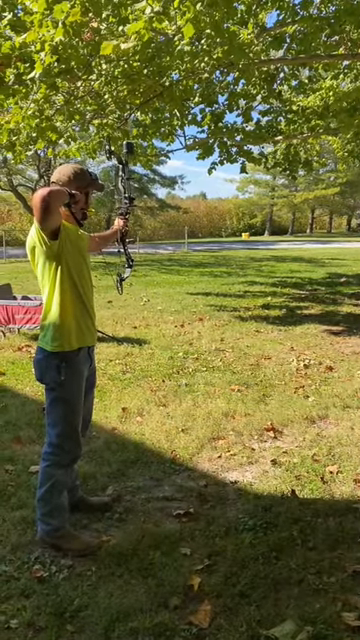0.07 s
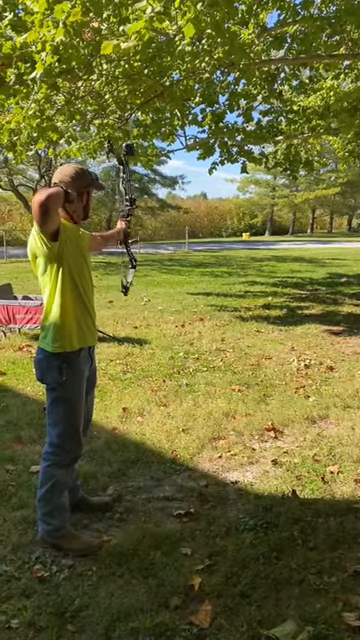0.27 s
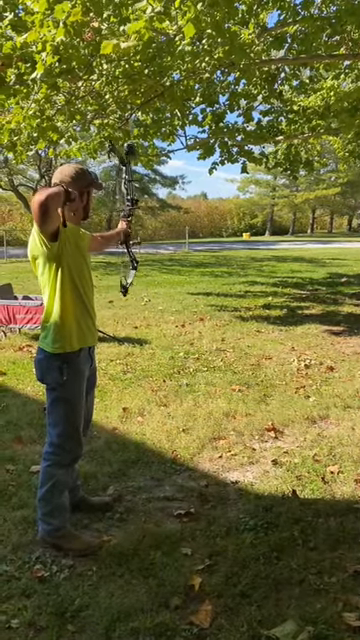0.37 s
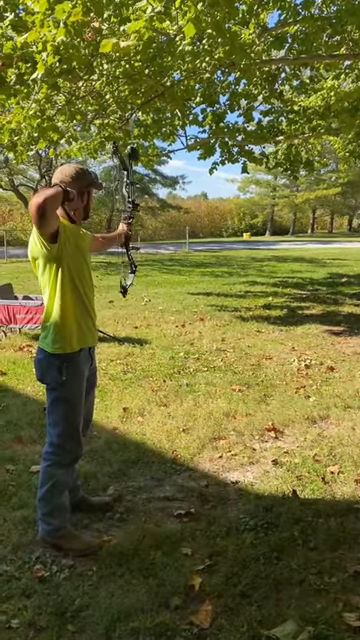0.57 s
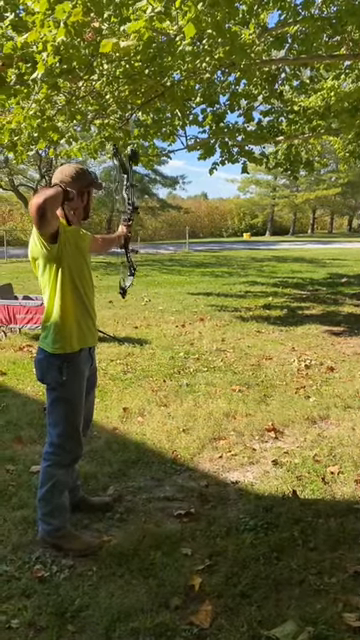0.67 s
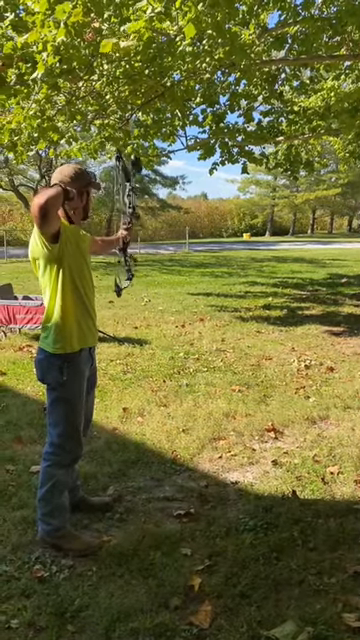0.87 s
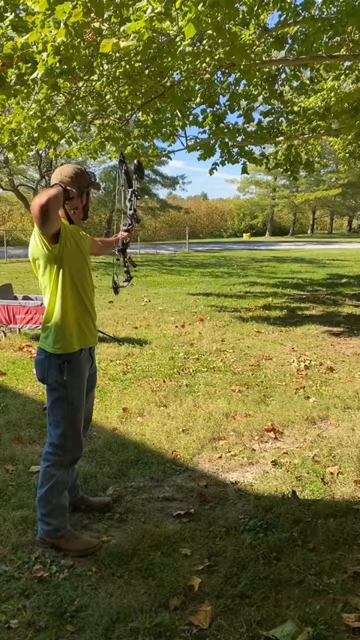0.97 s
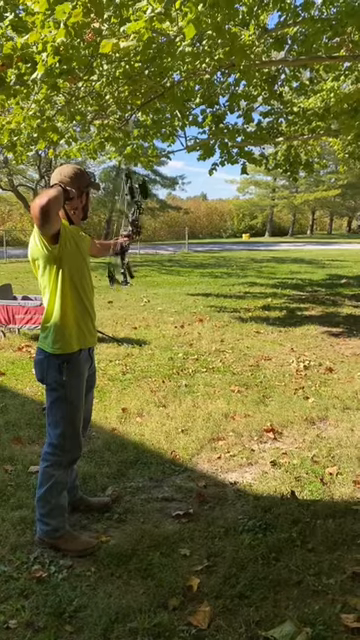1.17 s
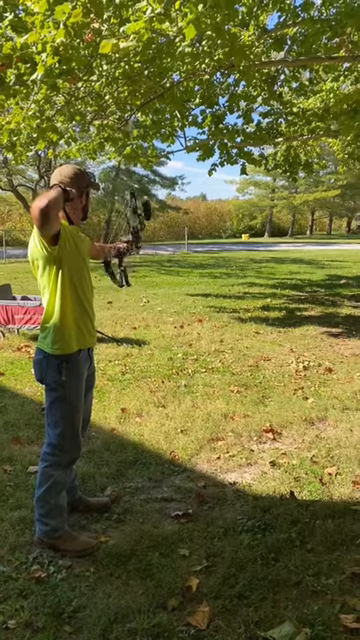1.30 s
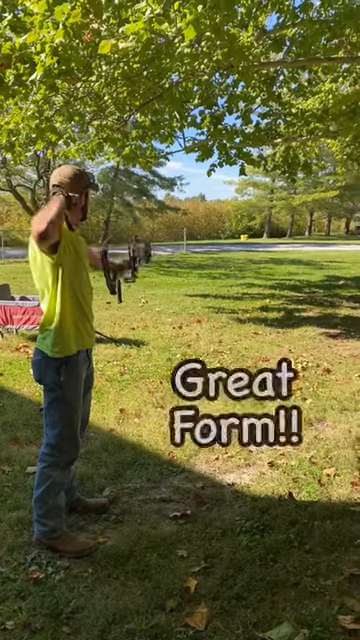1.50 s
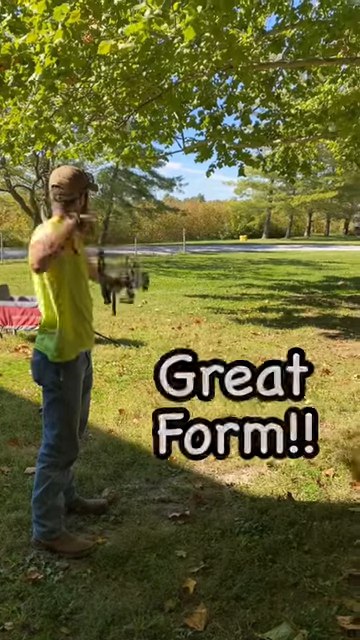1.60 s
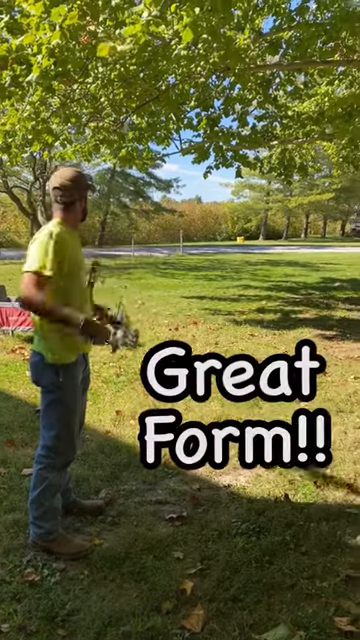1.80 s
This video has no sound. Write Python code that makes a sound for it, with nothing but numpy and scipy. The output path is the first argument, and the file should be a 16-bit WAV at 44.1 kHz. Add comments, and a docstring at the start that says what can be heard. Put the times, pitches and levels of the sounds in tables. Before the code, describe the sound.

A compound bow shot on a lawn. Quiet air with low distant traffic hum and very faint insects, then a tiny trigger tick at 0.18 seconds and an abrupt loud crack at 0.2, a cluster of string slaps with short limb and cam ringing. The bang scatters and fades. At 0.92 the arrow hits a far target with a weaker smack and thud; faint road hiss passes around 1.4, with a small tick near 1.76.

```python
"""A compound bow is shot on a lawn. Throughout, filtered noise and a wavering low tone give the hum of
distant traffic, and throbbing narrow noise bands give insects. The trigger ticks, the string's noise swells
as it rushes forward, and its blows crack and set the damped modes of limbs and cams ringing, while trees and
buildings scatter the bang as decaying noise. The arrow hisses away and lands in a far target with a smack,
a thud of falling pitch and a ringing body. A microphone with two ports hears it all."""
import sys
import numpy as np
from scipy import signal
from scipy.fft import rfft, irfft
from scipy.io import wavfile
from scipy.ndimage import uniform_filter1d

SR = 44100
rng = np.random.default_rng(int(sys.argv[2]) if len(sys.argv) > 2 else 0)


def dump_mix(stems):
    """Bounce the given channels to the path in sys.argv[1] as a 16-bit WAV at rate SR."""
    frames = np.atleast_2d(stems).T  # one column per channel
    limited = np.clip(frames, -1, 1)  # hard clip at full scale
    pcm = np.round(limited * 32767).astype(np.int16)
    wavfile.write(sys.argv[1], SR, pcm)


N = 81585

# Spectrum of the outdoor floor: f/Hz, relative level/dB
FLOOR_COLOUR = [(25, -8), (40, -7.5), (65, 2.5), (145, -7), (250, -13.5), (700, -19.5), (880, -22.5),
                (1050, -28), (1700, -33), (2400, -37), (4200, -33), (6500, -43.5), (8600, -37),
                (9100, -64.5), (16000, -66)]
# Level changes of the floor's bass and middle: t/s, bass level/dB, middle level/dB
FLOOR_SWELL = [(0, -5.5, -3), (.3, -5, 3), (.5, 1, -3), (0.651, 1.5, -0.5), (0.851, -1.5, 0), (1.1, 0, 0),
               (1.22, -1, -2), (1.45, -2.5, 1), (1.85, -3.5, -1)]
# Faint high hiss: t/s, level/dB
HIGH_HISS = [(0, -100), (.9, -94), (1, -97), (1.18, -93), (1.24, -100), (1.33, -86.5), (1.52, -100),
             (1.62, -86.5), (1.85, -82)]
# Passing road hiss: t/s, level/dB
ROAD_HISS = [(1.24, -100.5), (1.32, -77), (1.39, -72), (1.43, -69.5), (1.5, -72), (1.56, -78), (1.7, -77.5),
             (1.85, -84.5)]
# Far engine tone: t/s, f/Hz, level/dB
ENGINE_TONE = [(0, 94.52, -64.5), (.5, 97.2, -63), (0.622, 100.5, -51), (0.852, 104, -58),
               (1, 110.7, -49.5), (1.301, 109.4, -53), (1.85, 110.8, -56)]
# Steadier far motors: f/Hz, bandwidth/Hz, level/dB
MOTOR_BANDS = [(66.1, 14, -63), (146, 13, -65.5)]
# Insect bands: f/Hz, bandwidth/Hz, level/dB
INSECT_BANDS = [(8360, 380, -76), (7820, 390, -76.5), (4930, 350, -83)]
# Throbbing of each insect band: rate/(1/s), depth (0-1)
INSECT_THROBS = [(16.9, .55), (16.9, .55), (61, .6)]
# Decay of the scatter from trees and buildings: f/Hz, t60/s
SCATTER_DECAY = [(100, 0.65), (300, 0.86), (700, 0.635), (1300, 1), (2000, 0.95), (3400, 0.84),
                 (4500, 0.66), (8000, 0.73), (15000, 0.22)]
# Spectrum of the scattered shot: f/Hz, relative level/dB
SHOT_TAIL_COLOUR = [(100, -27), (400, -2.5), (800, -1.5), (1300, -11), (2000, -6), (2900, -9), (4200, -2.5),
                    (6500, -7.5), (9000, -15), (12500, -9.5), (15500, -16)]
# Spectrum of the scattered thud: f/Hz, relative level/dB
THUD_TAIL_COLOUR = [(100, -5), (250, -10), (500, -13.5), (1200, -11), (2500, -17.5), (3300, -16),
                    (4000, -21.5), (8000, -30.5), (10500, -44), (12000, -57)]
# Microphone ports: f/Hz, sum level/dB, difference level/dB, difference phase/rad
PORT_RESPONSE = [(49.6, 0, -35.5, -3), (177, -1, -20, 5), (362, -2, -10.5, 1.2), (724, -0.5, -3, 1.1),
                 (1230, -2, -1, 0.5), (1700, -.5, -3.5, -1), (2500, -2, 0.5, -2), (3300, -2.5, -4, -1.5),
                 (4115, -5.5, -9, -4), (5300, -3.5, -1, -4.5), (6890, -6, -8, -9.5), (7950, -11, 1.5, -4),
                 (10500, -16, 2.5, -5.5), (12460, -6, -1, -8), (13900, 1, 0, -8)]
# Ringing modes of the target body: f/Hz, level/dB, t60/s
TARGET_MODES = [(66.5, -37.5, 0.18), (112, -28.5, 0.1), (240, -38.5, 0.094), (356, -43.5, 0.19),
                (990, -42.5, 0.059)]
# Spectrum of the arrow's smack: f/Hz, relative level/dB
SMACK_COLOUR = [(100, -20), (400, -29), (1200, -5), (2800, -0.5), (4500, -13.5), (8000, -4.5),
                (10500, -12.5), (13000, -57), (16000, -27)]
# Trigger and hardware ticks: t/s, level/dB, centre f/Hz, quarter of the t60/s
TRIGGER_TICKS = [(0.178, -38, 9000, 0.00081), (0.1796, -23.5, 10100, 0.00021),
                 (0.1834, -35.5, 8900, 0.0021), (0.189, -44, 9000, 0.00061), (.193, -43, 4980, 0.00102),
                 (0.785, -60.5, 14500, .006), (1.757, -47, 4700, 0.00088)]
# String slaps: t/s, length/s, f/Hz, level/dB
STRING_SNAPS = [(.2005, .0014, 3300, -12), (.2023, .002, 5300, -13)]
# Blows as string and cams hit their stops: t/s, limb ring level/dB, cam ring level/dB, crack level/dB
STOP_BLOWS = [(0.1976, -71.5, -47.5, -29), (0.2004, -40.5, -21, -16), (.2024, -39, -29.5, -16),
              (0.2043, -20, -37.5, -24), (.2068, -46.5, -39, -21), (0.2096, -32, -20, -18),
              (.2135, -42.5, -25, -27.5), (.217, -50, -41.5, -29), (.2215, -45, -40, -27),
              (.23, -47, -30.5, -33)]
# Modes of limbs, riser and cams: f/Hz, level relative to the blow/dB, t60/s
BOW_MODES = [(91, -6, .1), (202, -9.5, 0.08), (291, 3.5, 0.058), (447.5, -2.5, 0.17), (485, -0.5, 0.1),
             (633.3, -2.5, 0.096), (666, -10.5, 0.21), (748, -2.5, 0.045), (910, -13, .07),
             (1199, -4, 0.096), (1330, -8.5, 0.07), (1660, -8, 0.074), (2108, -11, .06),
             (2730, -19.5, 0.04), (3520, -11, 0.083), (4780, -15, 0.11), (5580, -4.5, 0.043)]
# Spectrum of cracks and rush: f/Hz, relative level/dB
CRACK_COLOUR = [(100, -0.5), (500, 3.5), (950, -7), (1300, 4), (2200, -6.5), (3500, -0.5), (5300, 0),
                (6500, -5.5), (8500, -12), (11000, -15), (15000, -15)]

FLOOR_DB = -52
TYRES_HZ, TYRES_WIDTH_HZ = 1642, 840
NEAR_T60_S, LATE_DB = 0.24, -10  # dense early scatter, and the late part under it
SHOT_TAIL_DB, THUD_TAIL_DB = -28, -40.5
THUD_NEAR_DB = -2.5  # the far target gets less early scatter
SHOT_GAP_HZ, FAR_GAP_HZ = (7750, 12000), (8750, 12400)  # treble bands where the sum is silent
THUD_S, THUD_DB, THUD_LENGTH_S = .916, -26.5, 0.0092
THUD_TOP_HZ, THUD_DROP_S = 2070, .00055  # starting pitch, and the time in which it halves
BODY_LAG_S = .0095  # the body swings back after the face has given
SMACK_DB, SMACK_T60_S = -33.5, 0.0095
FLIGHT_DB, FLIGHT_T60_S, FLIGHT_HZ, FLIGHT_WIDTH_HZ = -66.5, 2.2, 13350, 5000
RUSH_S, RUSH_END_S, RUSH_DB, RUSH_RISE_DB = .177, .2, -52, 26  # string and arrow speeding up
CRACK_T60_S = .016
CAM_HZ = 2000  # modes above this belong to the cams
LOW_HZ, EDGE_HZ = 40, 16500  # microphone bass roll-off, upper band limit


def gain_of(db):
    """Logarithmic level: 20 dB is a factor of ten in amplitude."""
    return 10 ** (np.asarray(db) / 20)


def evened(x):
    """Normalisation of mean power: the rms becomes 1."""
    return x / np.sqrt(np.mean(x ** 2) + 1e-20)


def read(points, hz):
    """Interpolation of table columns along a logarithmic frequency axis."""
    f, *columns = np.transpose(points)
    return np.squeeze([np.interp(np.log(hz + 1), np.log(f + 1), c) for c in columns])


def over_time(points, t):
    """Linear interpolation of a two-column table in time."""
    return np.interp(t, *np.transpose(points))


def shaped(x, gain):
    """Linear filtering: the spectrum is multiplied by a function of frequency."""
    spectrum = rfft(x) * gain(np.fft.rfftfreq(x.shape[-1], 1 / SR))
    return irfft(spectrum, x.shape[-1])


def hiss(colour):
    """Coloured noise: white noise weighted by a spectrum, at rms 1."""
    return evened(shaped(rng.standard_normal(N), lambda hz: gain_of(read(colour, hz))))


def band(hz, width_hz):
    """Band-limited noise: white noise through a smooth band-pass, at rms 1."""
    white = rng.standard_normal(N)
    return evened(shaped(white, lambda f: 1 / (1 + ((f - hz) / (width_hz / 2)) ** 4)))


def slow(rate):
    """Random modulation: sines of chance phase up to the given rate in Hz, at rms 1."""
    t = np.arange(N) / SR
    rates = np.geomspace(rate / 10, rate, 20)
    return evened(sum(np.sin(2 * np.pi * (f * t + rng.random())) / np.sqrt(f) for f in rates))


def dying(s, db, t60):
    """Exponential decay: a sudden start, then a fall of 60 dB in each t60."""
    t = np.arange(N) / SR - s
    return (t >= 0) * gain_of(db - 60 * np.abs(t) / t60)


def ring(s, hz, db, t60):
    """Damped free vibration: one struck mode, growing over its first half cycle."""
    t = np.arange(N) / SR - s
    onset = np.clip(t * hz * 2, 0, 1)
    return dying(s, db, t60) * np.sin(2 * np.pi * hz * t) * onset


def air():
    """Superposed random noise: a patchy floor with changing bass and middle, road hiss and high hiss."""
    t = np.arange(N) / SR
    hz, frames, z = signal.stft(hiss(FLOOR_COLOUR), SR, nperseg=1024)
    patches = rng.standard_normal(z.shape)
    patches = evened(uniform_filter1d(uniform_filter1d(patches, 10, 0), 10, 1))
    s, low_db, middle_db = np.transpose(FLOOR_SWELL)
    low = 1 / (1 + (hz[:, None] / 200) ** 4)
    middle = (1 - low) / (1 + (hz[:, None] / 2500) ** 4)
    swell_db = low * np.interp(frames, s, low_db) + middle * np.interp(frames, s, middle_db)
    patch_db = 1.78 * patches * (1 - 0.79 * low)  # the bass is smoother
    floor = signal.istft(z * gain_of(FLOOR_DB + patch_db + swell_db), SR, nperseg=1024)[1][:N]
    high = band(14300, 2600) * gain_of(over_time(HIGH_HISS, t))
    tyres = band(TYRES_HZ, TYRES_WIDTH_HZ) + 0.72 * band(TYRES_HZ, TYRES_WIDTH_HZ / 5)
    return floor + high + tyres * gain_of(over_time(ROAD_HISS, t))


def engine():
    """Frequency modulation: phase sums a wavering pitch; narrow noise bands add steadier motors."""
    t = np.arange(N) / SR
    s, hz, db = np.transpose(ENGINE_TONE)
    turns = np.cumsum(np.interp(t, s, hz) + .8 * slow(7.3)) / SR
    level = gain_of(np.interp(t, s, db) + 1.4 * slow(6.7))
    tone = np.sqrt(2) * np.sin(2 * np.pi * turns) * level
    return tone + sum(gain_of(d) * band(f, w) for f, w, d in MOTOR_BANDS)


def insects():
    """Amplitude modulation: each narrow noise band throbs with a cosine."""
    t = np.arange(N) / SR
    chorus = 0
    for (hz, width_hz, db), (rate, depth) in zip(INSECT_BANDS, INSECT_THROBS):
        throb = 1 + depth * np.cos(2 * np.pi * rate * (t - 1.165))
        chorus = chorus + gain_of(db) * band(hz, width_hz) * throb
    return chorus


def yard(s, db, colour, near_db=0):
    """Multiple scattering: lumpy early noise, and a late part decaying at its own rate in each band."""
    hz, frames, z = signal.stft(hiss(colour), SR, nperseg=128)
    lumps = uniform_filter1d(rng.standard_normal(z.shape), size=5, axis=0)
    lumps = evened(uniform_filter1d(lumps, size=8, axis=1))
    late_db = 1.8 * lumps + LATE_DB - 60 * frames / read(SCATTER_DECAY, hz)[:, None]
    late = signal.istft(z * gain_of(late_db), SR, nperseg=128)[1][:N]
    t = np.arange(N) / SR
    near = hiss(colour) * gain_of(near_db + 2. * slow(150.) - 60 * t / NEAR_T60_S)
    tail = gain_of(db) * (late + near) * np.minimum(t / 0.0024, 1)
    return np.pad(tail, (round(s * SR), 0))[:N]


def target():
    """Impact: a noise smack, a thud whose pitch drops as the face gives, then modes of the body."""
    t = np.maximum(np.arange(N) / SR - THUD_S, 0)
    hz = THUD_TOP_HZ / (1 + t / THUD_DROP_S)
    u = t / THUD_LENGTH_S
    envelope = np.maximum(.65 + .5 * u - 1.15 * u ** 8, 0)
    thud = np.sin(2 * np.pi * np.cumsum(hz * (t > 0)) / SR) * gain_of(THUD_DB) * envelope
    body = sum(ring(THUD_S + BODY_LAG_S, *mode) for mode in TARGET_MODES)
    smack = hiss(SMACK_COLOUR) * dying(THUD_S - .0003, SMACK_DB, SMACK_T60_S)
    return thud + body + smack


def flight():
    """Flow noise: the vanes hiss, fading as the arrow flies off, until it lands."""
    fading = dying(RUSH_END_S, FLIGHT_DB, FLIGHT_T60_S)
    return band(FLIGHT_HZ, FLIGHT_WIDTH_HZ) * fading * (np.arange(N) / SR < THUD_S)


def ticks():
    """Impulsive excitation: short bursts of wide-band noise from trigger and hardware."""
    return sum(band(hz, hz * 1.4) * dying(s, db, 4 * length) for s, db, hz, length in TRIGGER_TICKS)


def snap(s, length, hz, db):
    """Brief forced vibration: the string slaps its stop in a squeak that swells and is choked."""
    u = (np.arange(N) / SR - s) / length
    swell = np.abs(np.sin(np.pi * np.clip(u, 0, 1))) ** .5
    return gain_of(db) * swell * np.sin(2 * np.pi * hz * length * u)


def bow():
    """Modal excitation: the string's rush ends in blows that crack and ring limbs and cams."""
    t = np.arange(N) / SR
    u = (t - RUSH_S) / (RUSH_END_S - RUSH_S)
    rush = (u > 0) * (u < 1) * gain_of(RUSH_DB + RUSH_RISE_DB * np.clip(u, 0, 1) ** 4.5)
    # the powers of overlapping cracks add
    cracks = np.sqrt(sum(dying(s, db, CRACK_T60_S) ** 2 for s, _, _, db in STOP_BLOWS))
    noise = shaped((rush + cracks) * hiss(CRACK_COLOUR), lambda hz: hz ** 2 / (hz ** 2 + 250 ** 2))
    ringing = 0
    for s, limb_db, cam_db, _ in STOP_BLOWS:
        for hz, db, t60 in BOW_MODES:
            blow_db = cam_db if hz > CAM_HZ else limb_db
            ringing = ringing + ring(s, hz, db + blow_db, t60)
    return noise + ringing


def ports(direct, scattered, gap_hz):
    """Sum and difference of two channels; in gap_hz, if given, the sum is silent."""
    a, b = scattered(), scattered()  # independent scatter widens the difference

    def side_gain(hz):
        """Complex response: level and phase of the difference."""
        _, side_db, phase = read(PORT_RESPONSE, hz)
        return gain_of(side_db) * np.exp(1j * phase)

    mid = shaped(direct + a, lambda hz: gain_of(read(PORT_RESPONSE, hz)[0]))
    side = shaped(direct + .5 * a + 1.29 * b, side_gain)
    if gap_hz:
        band_stop = signal.firwin(255, gap_hz, window=("kaiser", 6), fs=SR)
        mid = signal.oaconvolve(mid, band_stop, "same")
    return np.array([mid + side, mid - side])


def scene():
    """Superposition: the shot, the far sounds and floor, and ticks and target without a gap."""
    shot = ports(bow() + sum(snap(*row) for row in STRING_SNAPS) + flight(),
                 lambda: yard(RUSH_END_S, SHOT_TAIL_DB, SHOT_TAIL_COLOUR), SHOT_GAP_HZ)
    far = ports(engine() + insects(),
                lambda: air() + yard(THUD_S, THUD_TAIL_DB, THUD_TAIL_COLOUR, THUD_NEAR_DB), FAR_GAP_HZ)
    sharp = ports(ticks() + target(), lambda: 0, None)
    return shot + far + sharp


def record(dry):
    """Band limitation: the microphone's bass roll-off and an upper edge."""
    low = signal.sosfilt(signal.butter(3, LOW_HZ, "high", fs=SR, output="sos"), dry)
    edge = signal.firwin(511, EDGE_HZ, window=("kaiser", 9), fs=SR)
    return signal.oaconvolve(low, edge[None], "same")


dry = scene()
out = record(dry)
dump_mix(out)
```